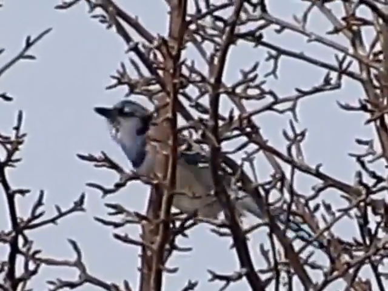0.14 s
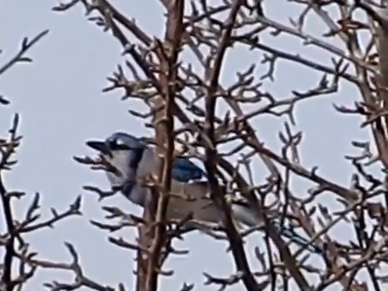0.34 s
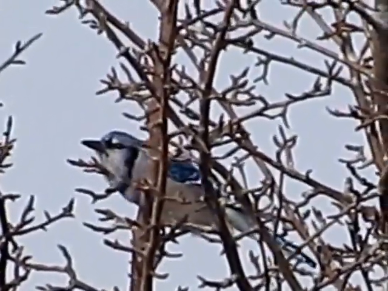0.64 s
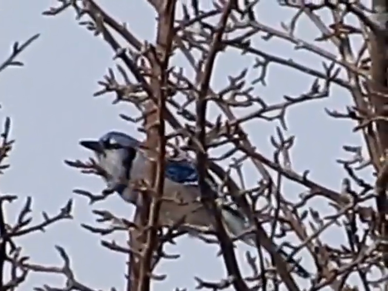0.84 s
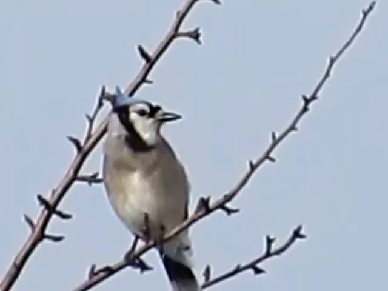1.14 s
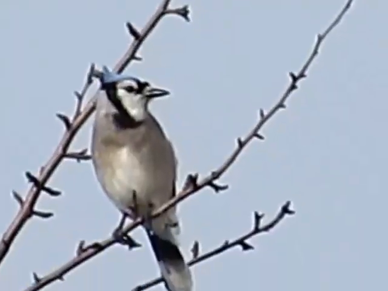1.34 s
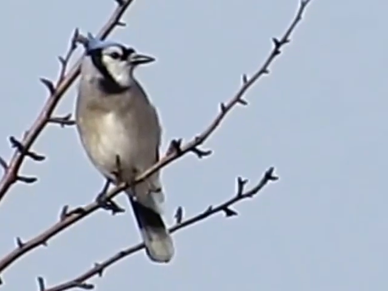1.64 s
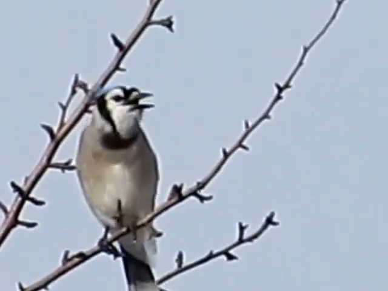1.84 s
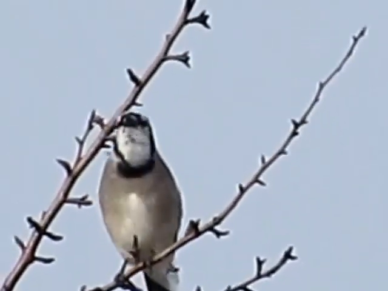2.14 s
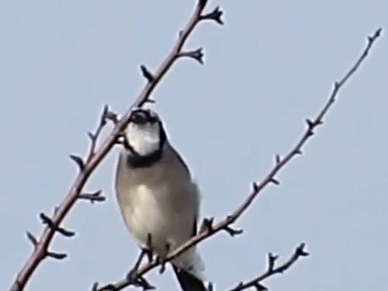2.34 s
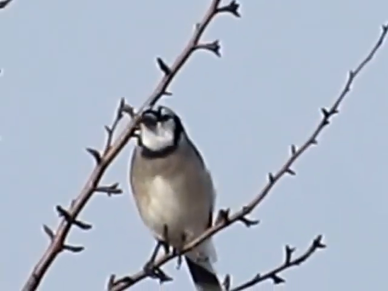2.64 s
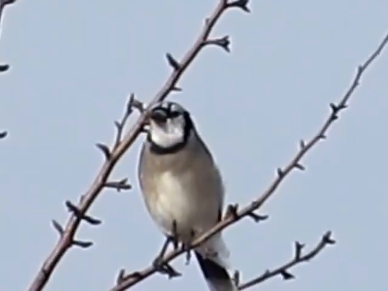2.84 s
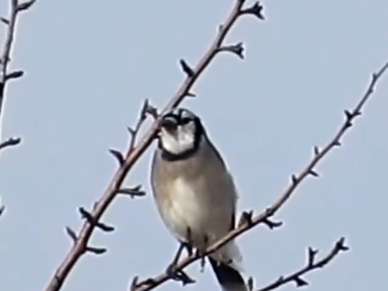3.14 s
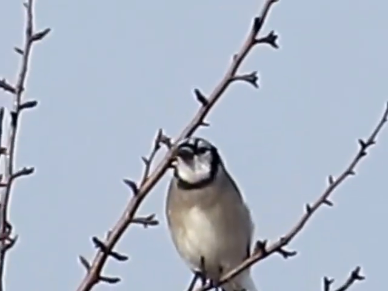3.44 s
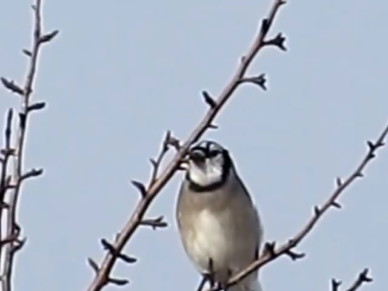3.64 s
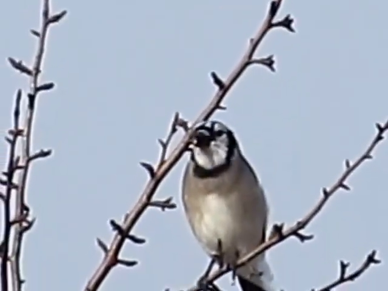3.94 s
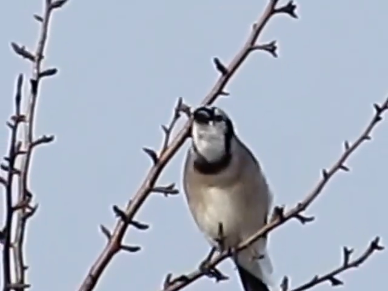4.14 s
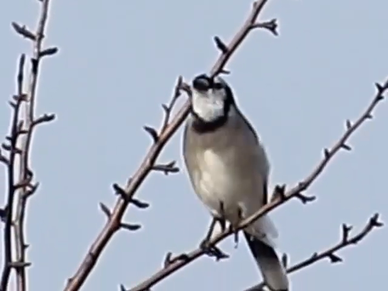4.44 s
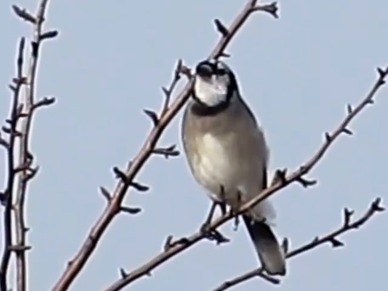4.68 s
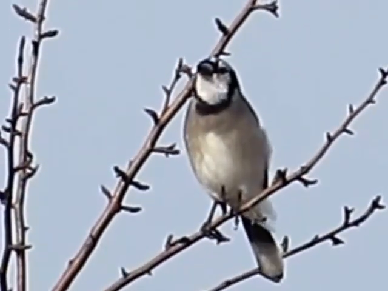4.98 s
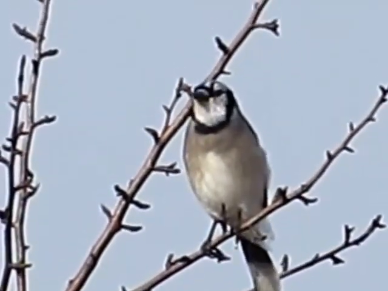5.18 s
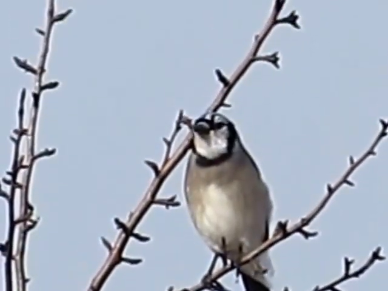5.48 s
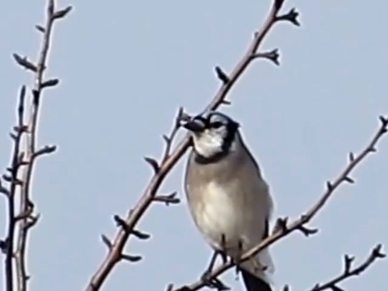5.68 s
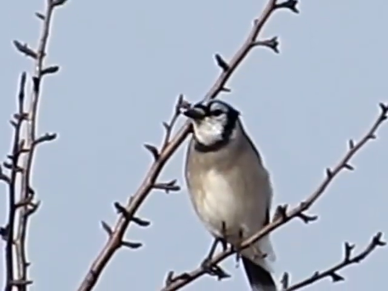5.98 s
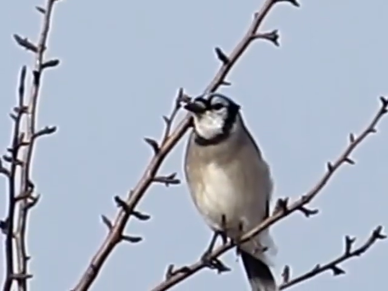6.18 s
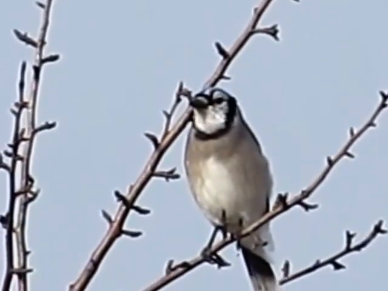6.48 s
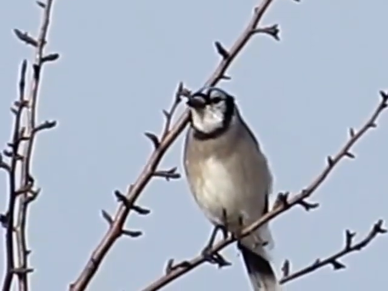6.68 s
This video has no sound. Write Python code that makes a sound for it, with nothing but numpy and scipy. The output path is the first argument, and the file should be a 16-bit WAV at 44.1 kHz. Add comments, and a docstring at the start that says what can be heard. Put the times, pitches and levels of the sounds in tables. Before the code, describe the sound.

Blue jays give harsh, raspy jeers in bare trees over wavering distant traffic and hiss, with loud wind thumps and one abrupt moment of silence.

```python
"""Over a wavering traffic roar, hiss and a thin whine, gusts thump a microphone and blue jays scold in bare trees.
Two short jeers (squeak, rasp, clear note, catch, squeak) share the first second with a dry rustle.
Everything drops out at 0.96 s for a third of a second; then come seven more short jeers, two long buzzing ones
among them, with dry ticks from 3.3 s and thumps again near the end.
Voices are chopped harmonic stacks; air, road and rustle are shaped noise; ticks are band-passed noise bursts."""
import sys
import numpy as np
from scipy import signal
from scipy.fft import rfft, irfft, next_fast_len
from scipy.io import wavfile
from scipy.ndimage import map_coordinates

SR = 44100
rng = np.random.default_rng(int(sys.argv[2]) if len(sys.argv) > 2 else 0)


def dump_mix(stems):
    """Bounce the given channels to the path in sys.argv[1] as a 16-bit WAV at rate SR."""
    frames = np.atleast_2d(stems).T  # one column per channel
    limited = np.clip(frames, -1, 1)  # hard clip at full scale
    pcm = np.round(limited * 32767).astype(np.int16)
    wavfile.write(sys.argv[1], SR, pcm)


N = 300541
T = np.arange(N) / SR
WHINE_HZ = 15734
TOP_HZ = 15900

# hiss spectrum: (frequency [Hz], relative level [dB])
HISS_COLOUR = [(1500, 5), (3000, -0.5), (5000, 0), (8000, 0.5), (11000, -1), (13500, -4), (15700, -8)]
# far traffic spectrum: (frequency [Hz], relative level [dB])
TRAFFIC_COLOUR = [(18, -50), (30, -4), (139, 0), (173, -5), (315, -10), (354, -9.5), (433, -11),
                  (507, -9.5), (684, -16.5), (818, -8), (959, -7), (1550, -14.5), (1890, -24), (2400, -33),
                  (3500, -40), (4550, -56), (7700, -120)]
# far traffic before and after the dropout, two lists: (time [s], relative level [dB])
TRAFFIC_LEVEL = [
    [(0.05, -57), (0.298, -56.5), (0.458, -54), (0.75, -54.5)],
    [(1.55, -51), (3.47, -50), (4.88, -51), (6.7, -49.5)],
]
# gusts at the microphone: (time [s], half length [s], level before turbulence [dB])
GUSTS = [(0.009, 0.08, -17.5), (0.119, 0.069, -30), (0.54, 0.061, -21.5), (0.73, 0.018, -25),
         (0.782, 0.023, -27.5), (0.947, 0.021, -34), (4.273, 0.089, -29), (5.0, 0.23, -47),
         (5.917, 0.038, -27), (6.065, 0.021, -25), (6.45, 0.15, -20.5), (6.661, 0.022, -16.5),
         (6.81, 0.031, -18.5)]
# strongest eddies: (time [s], level [dB], centre [Hz])
BUFFETS = [(.009, -0.5, 150), (0.053, -14, 132), (.534, -12, 100), (0.581, -8, 143.4), (.949, -11.5, 139),
           (6.382, -6, 108), (6.443, -9, 122), (6.515, -7.5, 122), (6.588, -13.5, 110), (6.647, -5.5, 122)]
# strong wind spectrum: (frequency [Hz], relative level [dB])
GUST_COLOUR = [(20, -60), (45, -17), (85, 17), (140, -7.5), (210, -6.5), (320, -18.5), (600, -41),
               (1500, -59.5)]
# light wind spectrum: (frequency [Hz], relative level [dB])
BREEZE_COLOUR = [(20, -17), (45, 6.5), (90, -17), (140, -8), (220, -11), (480, -14.5), (700, -29),
                 (900, -20.5), (2000, -37)]
# short jeers: (start [s], end [s], nominal pitch [Hz], relative level [dB], crescendo [dB],
#   rasp length [s], rasp level [dB], tilt [dB/octave], bill resonance [Hz], its lift [dB],
#   top harmonics [dB], opening squeak [dB], closing squeak [dB])
JEERS = [ (.115, .336, 845, -5.5, 6.5, 0.093, 1, -1, 3190, 3, -1.5, -69, -68),
         (0.378, .622, 844, -1, -0.5, 0.075, 1.5, -2, 3220, 7.5, -7, -70, -73.5),
         (1.767, 1.996, 851, 1, 1.5, 0.084, 2, 1.5, 5500, -1, 1, -59, -56),
         (3.256, 3.486, 839, -1.5, 0.5, 0.081, 1, -0.5, 2000, 7.5, 2, -62, -52),
         (3.546, 3.79, 851, 2.5, 0, 0.061, 0, 1, 5000, 0.5, -3, -49, -48),
         (3.934, 4.15, 836, -4.5, -1, 0.1, 0.5, 0.5, 4150, 4.5, 0, -64, -60),
         (5.185, 5.411, 849, -0.5, 0, 0.05, -0.5, -1, 2000, -1.5, 0.5, -54, -52),
         (6.052, 6.261, 838, -2.5, 2.5, 0.085, 0, 0, 2900, 7, 1, -73, -57),
         (6.226, 6.441, 844, -4, -2, 0.061, 2.5, -1, 1700, 5, 0, -66, -56), ]
# short jeer timbre: (harmonic number, rasp [dB], clear note [dB], catch [dB])
JEER_TIMBRE = [(2, -55.5, -55, -57), (3, -56, -57.5, -56), (4, -57, -61.5, -62.5), (5, -67, -63.5, -67.5),
               (6, -66.5, -66, -65.5)]
# long jeers: (start [s], end [s], nominal pitch [Hz], relative level [dB],
#   buzz start [s], buzz end [s], buzz rate [Hz])
LONG_JEERS = [(2.068, 2.404, 828, -3, 2.116, 2.318, 213.6), (4.248, 4.57, 830, 0, 4.288, 4.488, 212)]
# long jeer timbre: (harmonic number, bright opening [dB], buzz [dB], buzz stop [dB], closing whistle [dB])
LONG_TIMBRE = [(2, -56.5, -52, -62, -76), (3, -60, -61, -60, -53.5), (4, -54, -55, -57, -67),
               (5, -58, -70, -66, -77), (6, -52, -65, -61.5, -75)]
# harmonics above the sixth: (harmonic number, level against the fifth if odd, sixth if even [dB])
TOP_HARMONICS = [(7, -12), (8, -10), (9, -17), (10, -15), (11, -24), (12, -18), (13, -14), (14, -25)]
# second syrinx vibration, rasping and buzzing:
#   (chop depth [0-1], pitch kick [Hz], chop lag [rad], scatter of that lag [rad])
RASP = (.4, 26, .3, .9)
BUZZ = (.3, -32, 1.4, .7)
# dry rustle: (time [s], relative level [dB])
RUSTLE_LEVEL = [(0.2, -72), (0.222, -79), (0.284, -58.5), (0.34, -58.5), (0.45, -64.5), (0.702, -57.5),
                (0.956, -61.5), (0.96, -66)]
# spectra of the rustle, its wide part and its scuff: (frequency [Hz], relative level [dB])
RUSTLE_COLOUR = [(300, 16.5), (900, -6.5), (1800, 4), (2800, -1), (4200, -4), (6000, -4), (8500, -4.5),
                 (12000, -10.5), (15500, -19)]
RUSTLE_WIDE_COLOUR = [(2000, -10.5), (4500, -9), (7500, 4.5), (11000, 4.0), (15500, 4)]
SCUFF_COLOUR = [(1100, -15.0), (1900, -2.0), (3000, -11), (4200, -16.5)]
# dry ticks: (time [s], relative peak [dB], centre [Hz])
TICKS = [(3.277, -29.5, 9400), (3.342, -33, 14000), (3.391, -33, 9000), (3.572, -27.5, 6700),
         (3.592, -34, 7300), (3.605, -39, 10000), (4.016, -32, 10400), (4.064, -40, 7000),
         (6.703, -33, 12000)]
# dropout: (start [s], end [s])
GAP_S = (.961, 1.2955)


def undb(db):
    """Decibels to amplitude gain."""
    return 10 ** (np.asarray(db) / 20)


def curve(rows):
    """Joins (time, value) rows by straight lines over the scene."""
    time_s, value = np.transpose(rows)
    return np.interp(T, time_s, value)


def walk(rate_hz, size=N):
    """Smooth random drift, spread near 1, with rate_hz random knots a second."""
    knots = rng.standard_normal(int(size * rate_hz / SR) + 4)
    return map_coordinates(knots, [1 + np.arange(size) * rate_hz / SR], order=2)


def noise(colour):
    """Noise of rms 1 with a tabled spectrum that falls away beyond its ends."""
    size = next_fast_len(N, True)
    f = np.arange(size // 2 + 1) * SR / size + 1  # +1 avoids log(0)
    hz, db = np.transpose(colour)
    gain = undb(np.interp(np.log(f), np.log(hz), db))
    gain = gain * np.minimum(1, f / hz[0]) ** 2 * np.minimum(1, hz[-1] / f) ** 2
    y = irfft(rfft(rng.standard_normal(size)) * gain, size)[:N]
    return y / y.std()


def gate(t, start_s, end_s, edge_s):
    """Opens at start_s and shuts at end_s, with linear edges."""
    opening = np.clip((t - start_s) / edge_s + .5, 0, 1)
    closing = np.clip((end_s - t) / edge_s + .5, 0, 1)
    return opening * closing


def pan(x, left_db):
    """Places a sound by its left minus right level."""
    return undb(np.array([[left_db], [-left_db]]) / 2) * x


def add(track, start_s, sound):
    """Mixes a sound into a track, trimmed at both ends of the track."""
    i = int(start_s * SR)
    part = sound[max(-i, 0):N - i]
    track[max(i, 0):max(i, 0) + len(part)] += part


def electronics(hiss_db=-65.0, whine_db=-75):
    """Faint even hiss, independent per channel, and a very high sine, mostly on the left."""
    hiss = undb(hiss_db) * np.array([noise(HISS_COLOUR), noise(HISS_COLOUR)])
    whine = undb(whine_db) * np.sqrt(2) * np.sin(2 * np.pi * WHINE_HZ * T)
    return pan(hiss, left_db=-0.3) + np.array([whine, 0.12 * whine])


def traffic(level_db=6.0, left_db=4.5, spread_db=-15):
    """Far roads: a broad noise roar that wavers a little, stronger on the left."""
    gain = undb(curve(np.vstack(TRAFFIC_LEVEL)) + level_db + 1.0 * walk(9))
    diffuse = np.array([noise(TRAFFIC_COLOUR), noise(TRAFFIC_COLOUR)])
    return gain * (pan(noise(TRAFFIC_COLOUR), left_db) + undb(spread_db) * diffuse)


def wind(breeze_db=-48, lull_db=-50, lean=0.31, stray_db=-16):
    """Eddies push the two microphone ports in opposite directions; the strongest land as single thumps."""
    strength = undb(lull_db)
    for s, half_s, db in GUSTS:
        strength = strength + undb(db) * np.exp(-((T - s) / half_s) ** 2)
    push = strength * undb(walk(35)) * noise(GUST_COLOUR)
    t = np.arange(-SR // 50, SR // 50) / SR
    for s, db, hz in BUFFETS:
        swell = np.hanning(len(t)) / np.cosh(t * hz / .33)
        thump = swell * np.cos(2 * np.pi * hz * t + rng.uniform(0, 2 * np.pi))
        add(push, s - 1 / 50, undb(db) * thump)
    # eddies favour one port a little, so part is common to both
    common = lean * np.tanh(2 * walk(60)) * push
    common = common + undb(stray_db) * strength * noise(GUST_COLOUR)
    breeze = undb(breeze_db + 2.0 * walk(39)) * noise(BREEZE_COLOUR)
    return pan(np.array([common + push + breeze, common - push - breeze]), left_db=0.34)


def squeak(hz, second_db, third_db, half_s=0.0025, fall_per_s=12, grit_db=5.5):
    """A few milliseconds of scratchy, steeply falling second and third harmonics."""
    t = np.arange(-SR // 100, SR // 100) / SR
    phase = 2 * np.pi * np.cumsum(hz * np.exp(-fall_per_s * t)) / SR
    swell = np.exp(-(t / half_s) ** 2) * undb(grit_db * walk(920, len(t)))
    return swell * (undb(second_db) * np.sin(2 * phase) + undb(third_db) * np.sin(3 * phase))


def syrinx(t, pitch_hz, levels_db, rough, rattle_hz, vibration, flip, top_db,
           jitter=0.0048, shimmer_db=1.92, sway_db=2.5):
    """A reedy harmonic stack; a second, slow vibration chops it and swings its pitch."""
    hoarse, rasp_jitter, wander_db = .28, .006, 3
    depth, swing_hz, lag_rad, scatter_rad = vibration
    size = len(t)
    # the membranes move chaotically in the attack as well as in the rasp
    chaos = np.maximum(rough, np.exp(-np.abs(t) / 0.029))
    rattle = 2 * np.pi * np.cumsum(rattle_hz * (1 + .035 * walk(70, size))) / SR
    # each cycle is a short kick, which spreads the sidebands wide
    kick = np.cos(rattle) + .7 * np.cos(2 * rattle) + .4 * np.cos(3 * rattle)
    unsteady = 1 + (jitter + rasp_jitter * chaos) * walk(600, size)
    hz = pitch_hz * unsteady + swing_hz * rough * kick
    phase = 2 * np.pi * np.cumsum(hz) / SR

    harmonics = list(enumerate(levels_db, 2))
    for k, db in TOP_HARMONICS:
        k = round(k)
        parent_db = levels_db[-1 - k % 2]  # fifth if odd, sixth if even
        # top harmonics come and go as the bill moves
        harmonics.append((k, parent_db + top_db + db + wander_db * walk(14.0, size)))

    voice = 0
    for k, db in harmonics:
        # each harmonic peaks at its own moment of the rattle, so the sidebands are uneven
        chop = 1 + depth * rough * np.cos(rattle - lag_rad + scatter_rad * rng.standard_normal())
        scratch = 1 + hoarse * chaos * walk(800, size)
        gain = undb(db + shimmer_db * walk(300, size) + sway_db * walk(22, size))
        gain = gain * (1 - (-1) ** k * flip) / np.hypot(1, flip)  # odd against even
        voice = voice + gain * chop * scratch * np.sin(k * phase + rng.uniform(0, 2 * np.pi))
    return np.sqrt(2) * voice


def jeer(t, length_s, pitch_hz, rasp_s, force_db, tilt_db, bill_hz, bill_db, top_db,
         scoop=0.0179, scoop_s=.015, sag=.032, catch_s=.062, catch_drop=.008,
         attack_db=-9, attack_s=0.0065, rasp_top_db=-3):
    """Rasp, clear note, catch: the pitch scoops up, then sags as the pressure runs out."""
    age = np.maximum(t, 0)
    sagging = sag * np.minimum(age / length_s, 1) ** 2.6
    hz = pitch_hz * (1 - scoop * np.exp(-age / scoop_s) - sagging)
    rough = gate(t, -1, rasp_s, edge_s=0.046)
    failing = gate(t, length_s - catch_s, 1, edge_s=0.03)
    levels_db = []
    for k, rasp_db, clear_db, catch_db in JEER_TIMBRE:
        tilt = tilt_db * np.log2(k / 3)
        # the bill's resonance comes out once the rasp has cleared
        bill = (1 - rough) * bill_db * np.exp(-(np.log2(k * pitch_hz / bill_hz) / 0.25) ** 2)
        # higher harmonics take longer to build up
        onset = attack_db * np.exp(-age / attack_s / (k / 3))
        rasp = rough * (force_db + rasp_db - clear_db)
        catch = failing * (catch_db - clear_db)
        levels_db.append(clear_db + rasp + catch + tilt + bill + onset)
    # as the pressure fails the voice catches, flipping between odd and even harmonics
    flutter = np.sin(2 * np.pi * 44 * (t - length_s) + 1.2 * walk(40, len(t)) + 3.7)
    flip = .55 * failing * np.tanh(2 * flutter)
    hz = hz * (1 - catch_drop * flip)
    voice = syrinx(t, hz, levels_db, rough, 118, RASP, flip, top_db + rasp_top_db * rough)
    return voice * gate(t, 0, length_s, edge_s=0.0052)


def long_jeer(t, length_s, pitch_hz, buzz_from_s, buzz_to_s, buzz_hz, lift=0.053, sag=0.027,
              turn_s=0.019, hold_s=0.097, whistle_s=0.046, top_db=-3):
    """A bright opening, a fast buzz that arches the pitch upward, and a thin closing whistle."""
    rough = gate(t, buzz_from_s, buzz_to_s, edge_s=.03)
    rise = np.clip((t - buzz_from_s) / 0.052 + .5, 0, 1)
    fall = np.clip((buzz_to_s - t) / 0.0915 + 0.183, 0, 1)
    hz = pitch_hz * (1 + lift * rise * fall - sag * t / length_s)
    stages_s = [buzz_from_s - turn_s, buzz_from_s + turn_s, buzz_from_s + hold_s,
                buzz_to_s, buzz_to_s + whistle_s]
    levels_db = []
    for _, opening, buzz, stop, whistle in LONG_TIMBRE:
        levels_db.append(np.interp(t, stages_s, [opening, buzz, buzz, stop, whistle]))
    voice = syrinx(t, hz, levels_db, rough, buzz_hz, BUZZ, 0, top_db)
    return voice * gate(t, 0, length_s, edge_s=0.011)


def jays(opening_hz=1150, opening_third_db=-12, lead_s=.022,
         closing_hz=1540, closing_third_db=0, trail_s=0.0027):
    """All jeers; the syrinx squeaks as it opens before a short one and as it shuts after it."""
    out, margin_s = np.zeros(N), 1 / 100
    t = np.arange(SR // 2) / SR - margin_s
    for (s, end, hz, db, crescendo_db, rasp_s, force_db, tilt_db, bill_hz, bill_db, top_db,
         opening_db, closing_db) in JEERS:
        length_s = end - s
        effort = undb(db + crescendo_db * (t / length_s - .5))
        voice = jeer(t, length_s, hz, rasp_s, force_db, tilt_db, bill_hz, bill_db, top_db)
        opening = squeak(opening_hz, opening_db, opening_db + opening_third_db)
        closing = squeak(closing_hz, closing_db, closing_db + closing_third_db)
        add(out, s - lead_s - margin_s, opening)
        add(out, s - margin_s, effort * voice)
        add(out, end + trail_s - margin_s, closing)
    for s, end, hz, db, buzz_from, buzz_to, buzz_hz in LONG_JEERS:
        voice = long_jeer(t, end - s, hz, buzz_from - s, buzz_to - s, buzz_hz)
        add(out, s - margin_s, undb(db) * voice)
    return out


def woods(x, t60_s=1.1, width=0.44):
    """Trunks and branches scatter back a faint tail, mostly of the middle harmonics."""
    wet_db, band_hz = -12, (2200, 3900)
    t = T[:SR]
    tail = rng.standard_normal((2, SR)) * undb(-60 * t / t60_s) * (1 - np.exp(-t / 0.0037))
    tail = tail / np.sqrt(np.sum(tail[0] ** 2))  # unit energy before the band-pass
    tail = signal.sosfilt(signal.butter(2, band_hz, "band", fs=SR, output="sos"), tail)
    mid, side = undb(wet_db) * signal.fftconvolve(x[None], tail, axes=1)[:, :N]
    return np.array([mid + width * side, mid - width * side])


def rustle(level_db=10.5, spread_db=-4, scuff_db=-50, scuff_at_s=.325, scuff_half_s=0.07):
    """A close, dry, fine-grained noise rustle whose treble is wide, with a fuller scuff early on."""
    gain = undb(curve(RUSTLE_LEVEL) + level_db + 1.0 * walk(150))
    gain = gain * gate(T, 0.14, 0.97, edge_s=.06)
    scuff_swell = np.exp(-((T - scuff_at_s) / scuff_half_s) ** 2)
    scuff = undb(scuff_db + 2.0 * walk(120)) * scuff_swell * noise(SCUFF_COLOUR)
    wide = gain * undb(spread_db) * noise(RUSTLE_WIDE_COLOUR)
    return pan(gain * noise(RUSTLE_COLOUR) + scuff, left_db=2.5) + np.array([wide, -wide])


def ticks(decay_s=0.00083, level_db=-6, right_share=0.98):
    """Tiny bright clicks close by: band-passed noise bursts, drawn separately for each port."""
    out, t = np.zeros((2, N)), T[:SR // 100]
    for s, db, hz in TICKS:
        band_hz = [hz * .75, min(hz * 1.3, SR * .45)]
        band = signal.butter(2, band_hz, "band", fs=SR, output="sos")
        for channel, share in zip(out, (1, right_share)):
            click = signal.sosfilt(band, rng.standard_normal(len(t)) * np.exp(-t / decay_s))
            add(channel, s, share * undb(db + level_db) * click / np.abs(click).max())
    return out


def scene():
    """Birds straight ahead in the trees, over traffic and wind."""
    birds = jays()
    background = electronics() + traffic() + wind()
    return background + pan(birds, left_db=0.0) + woods(birds) + rustle() + ticks()


def record(dry):
    """Partly notches out a band near 700 Hz, silences the gap and cuts the top."""
    notched = signal.lfilter(*signal.iirnotch(690, 5.0, fs=SR), dry)
    dipped = dry + 0.59 * (notched - dry)
    heard = dipped * (1 - gate(T, *GAP_S, edge_s=0.002))
    low_pass = signal.ellip(10, .1, 80, TOP_HZ, fs=SR, output="sos")
    return signal.sosfilt(low_pass, heard)


dry = scene()
out = record(dry)
dump_mix(out)
```